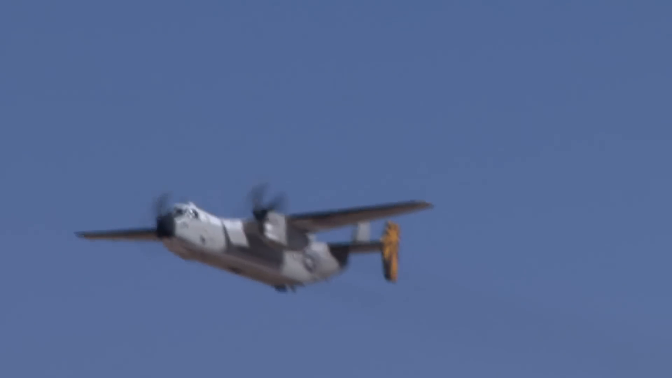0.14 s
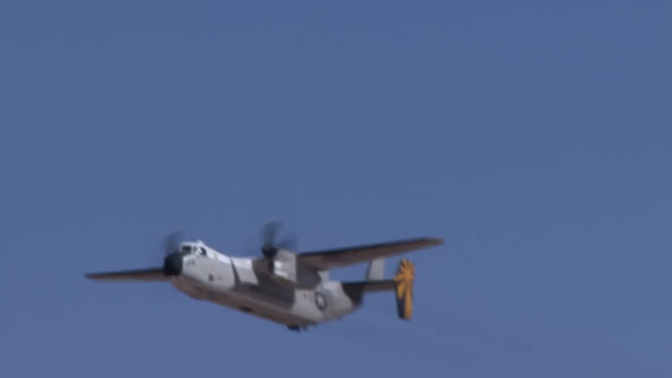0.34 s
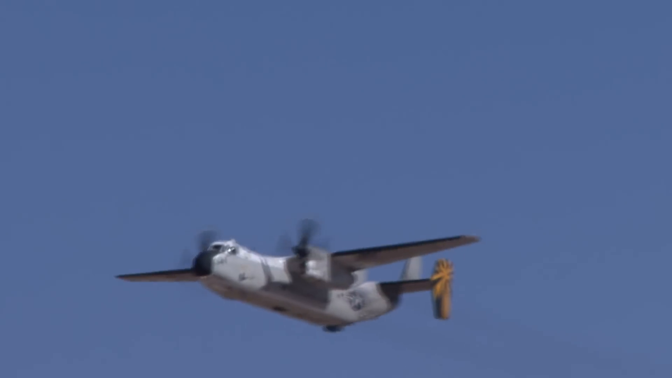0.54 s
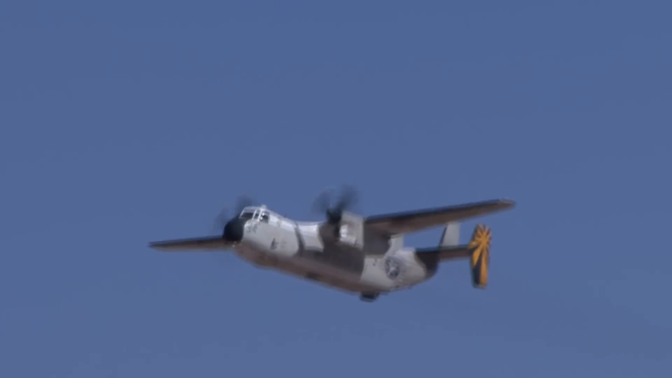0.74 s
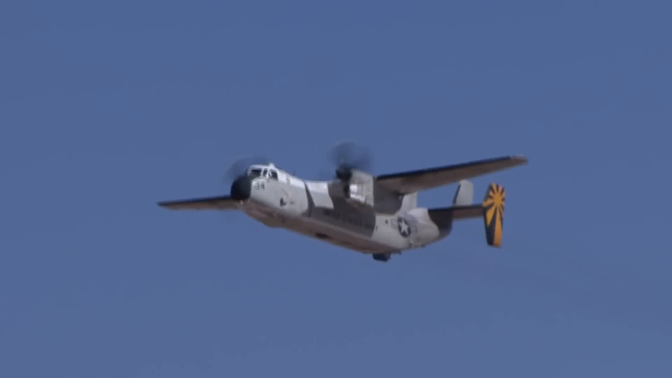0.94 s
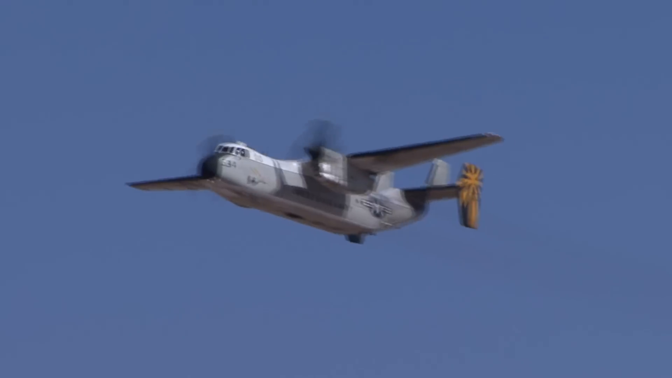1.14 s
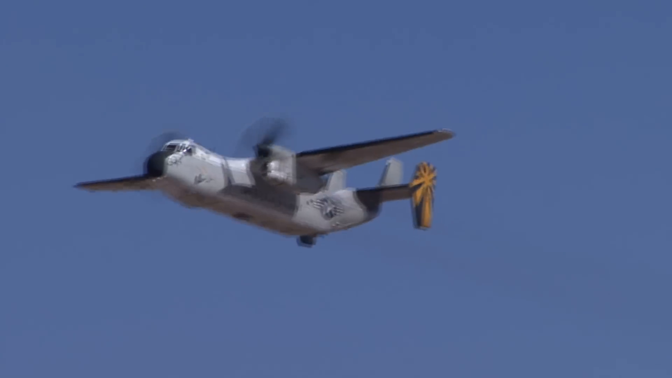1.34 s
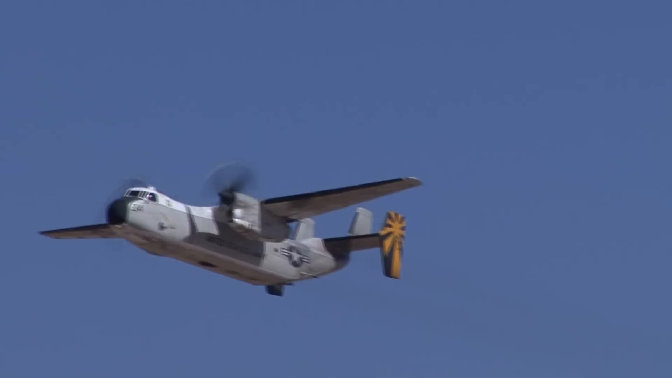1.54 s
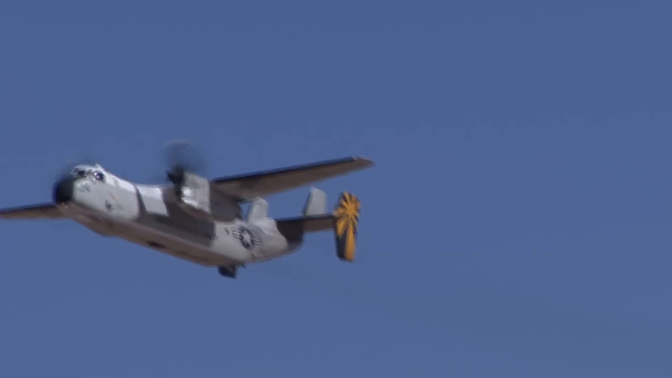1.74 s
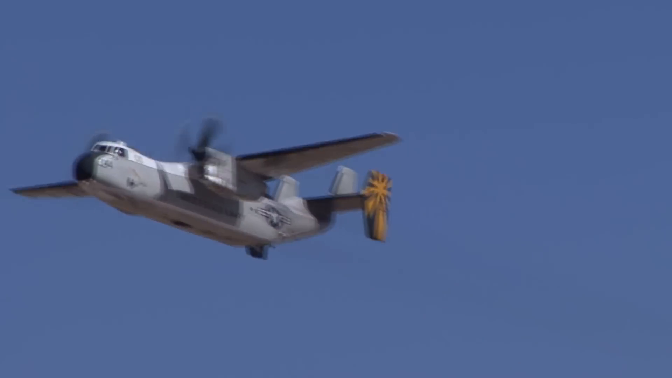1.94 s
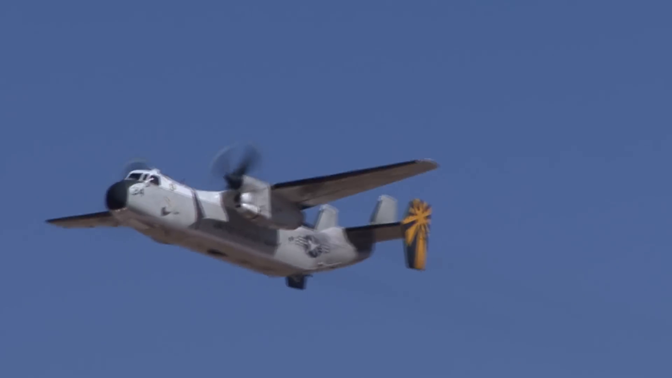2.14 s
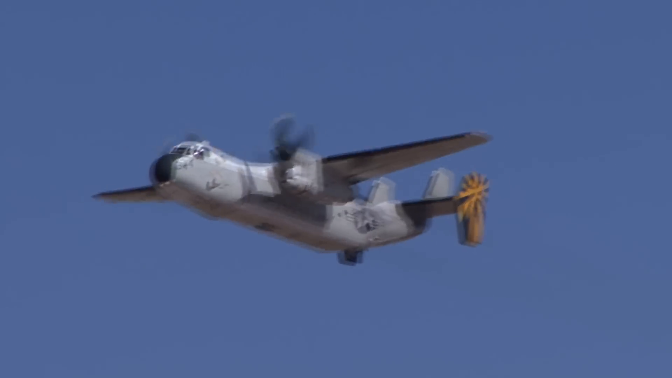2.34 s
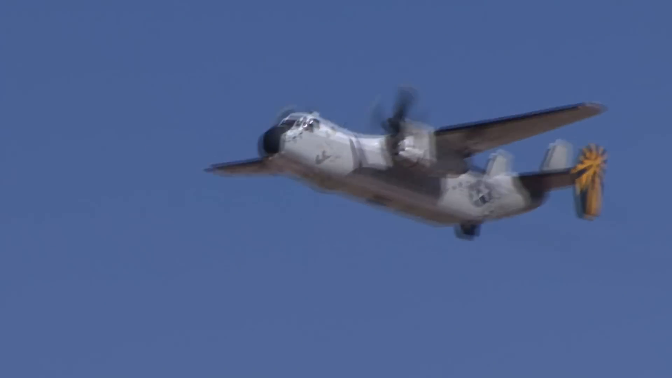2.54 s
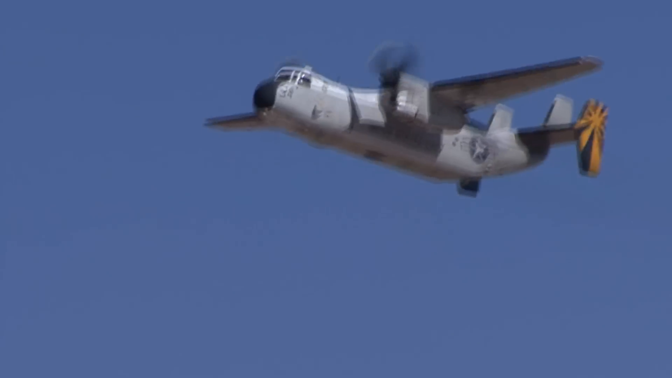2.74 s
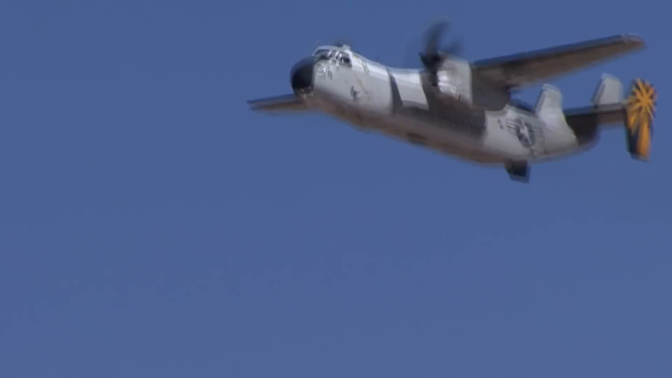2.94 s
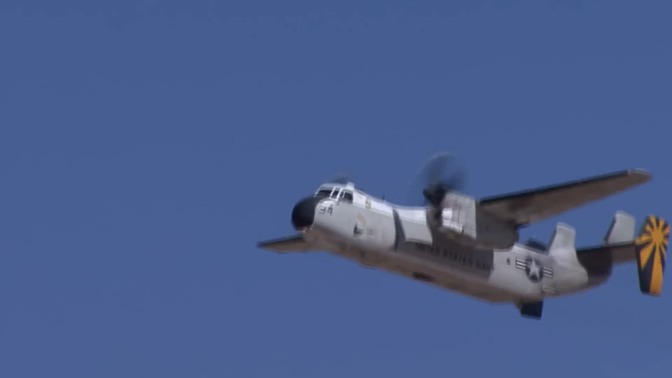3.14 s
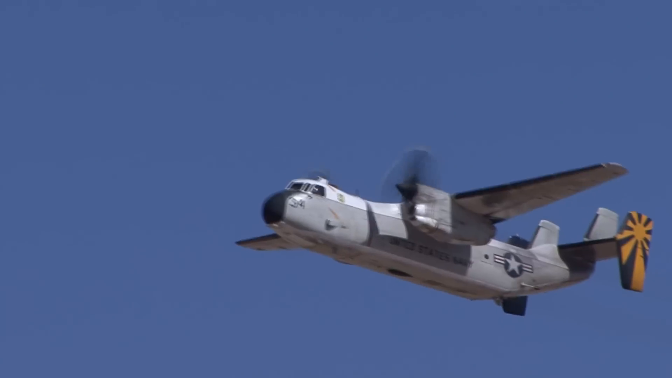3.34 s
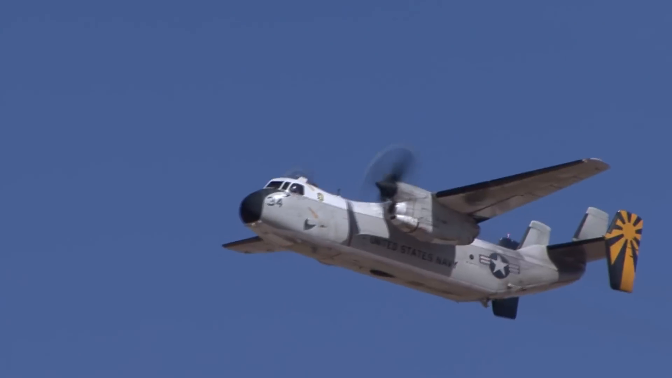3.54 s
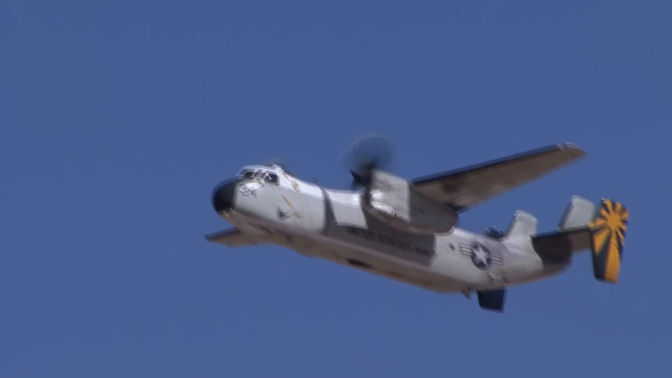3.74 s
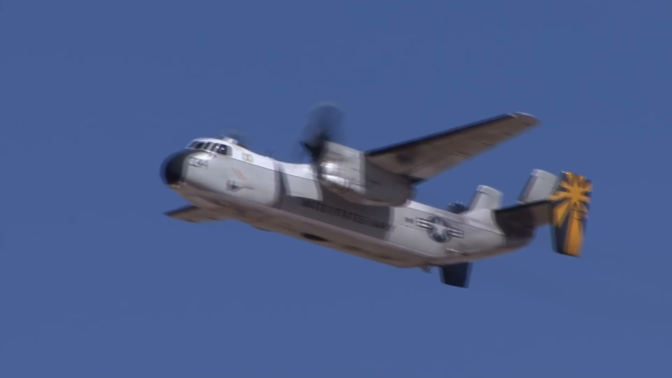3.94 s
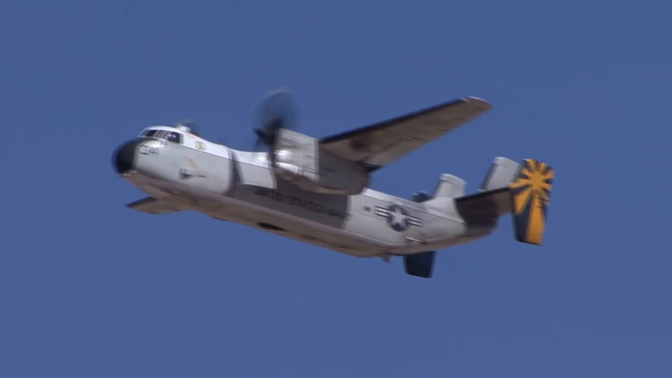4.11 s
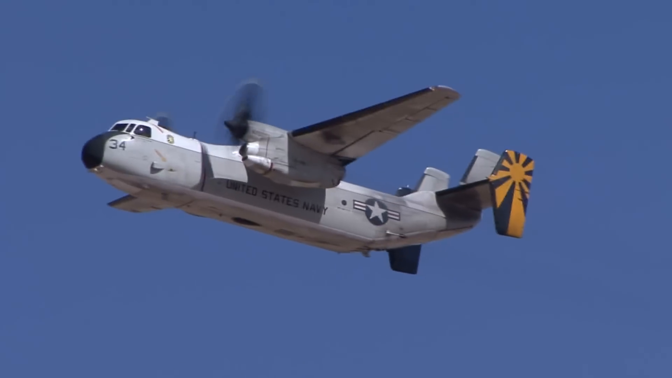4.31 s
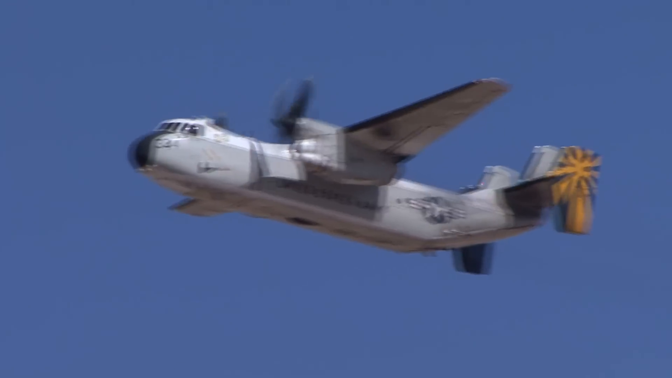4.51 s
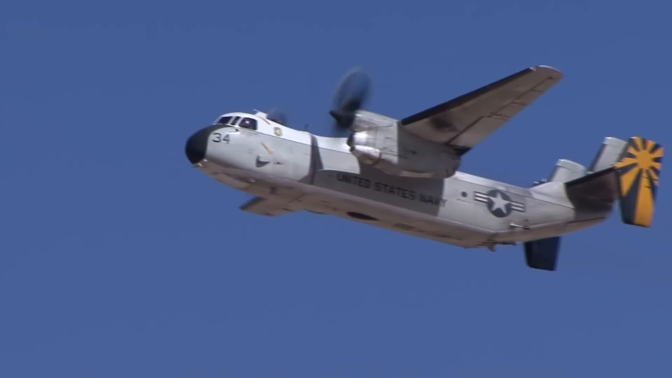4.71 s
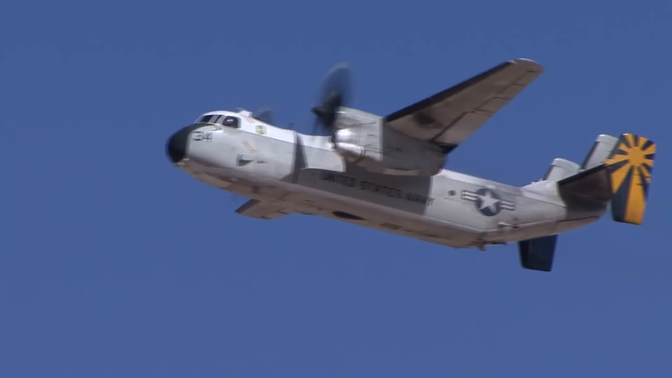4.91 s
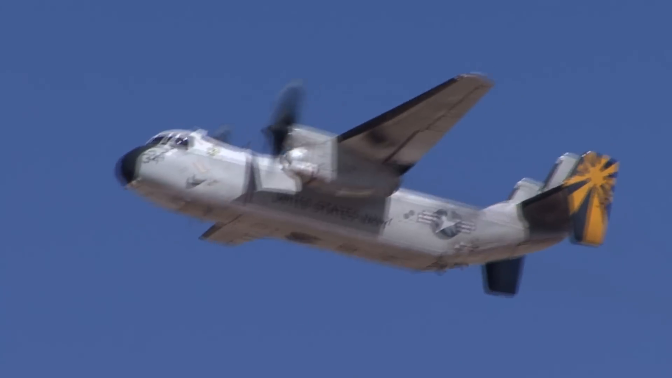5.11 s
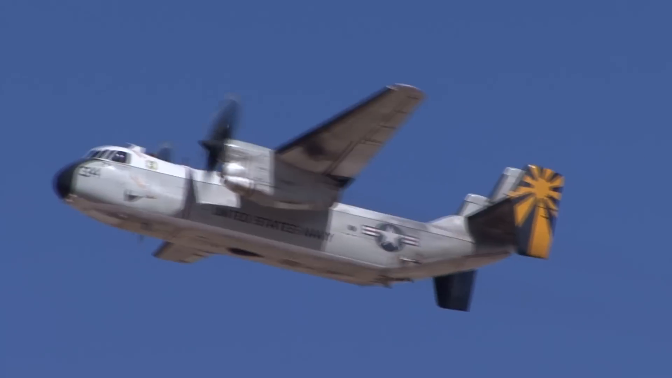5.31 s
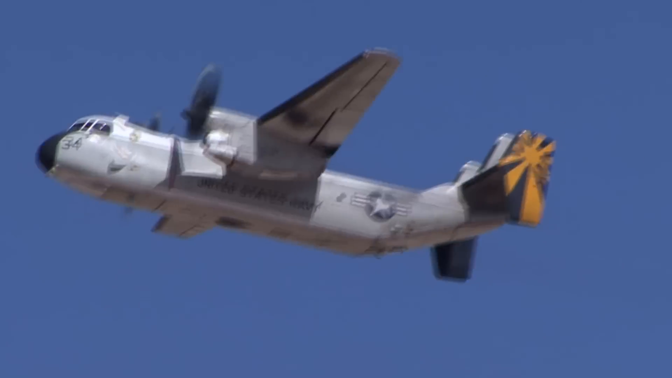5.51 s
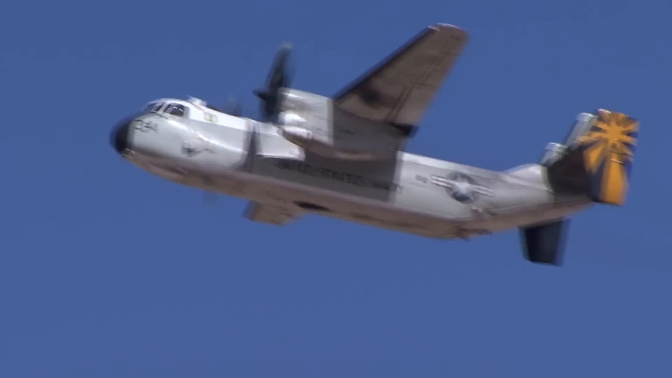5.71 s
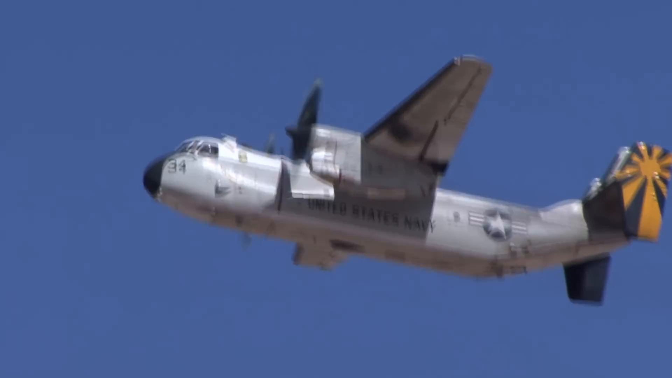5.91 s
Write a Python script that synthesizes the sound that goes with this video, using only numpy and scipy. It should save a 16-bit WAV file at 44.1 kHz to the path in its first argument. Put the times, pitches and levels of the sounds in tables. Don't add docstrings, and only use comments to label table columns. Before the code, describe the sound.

Deep propeller drone with a breathy, fluctuating roar draws nearer, pulsing and gradually dropping in pitch, over very faint hiss.

```python
import sys
import numpy as np
from scipy import signal
from scipy.fft import rfft, irfft
from scipy.io import wavfile
from scipy.ndimage import uniform_filter1d

SR = 44100
rng = np.random.default_rng(int(sys.argv[2]) if len(sys.argv) > 2 else 0)


def unload_audio(sound):
    columns = np.transpose(np.atleast_2d(sound))
    steps = np.round(np.clip(columns, -1, 1) * 32767)
    wavfile.write(sys.argv[1], SR, steps.astype(np.int16))


def elevation(decibels):
    levels = np.asarray(decibels, float)
    return 10 ** (levels / 20)


N = 267246

ROAR_BAND_HZ = [300, 760, 1900, 3900]


def in_time(rows, s):
    at, *columns = np.transpose(rows)
    return np.array([np.interp(s, at, c) for c in columns])


def at_hz(points, hz):
    point_hz, point_db = np.array(points)[:, :2].T
    return np.interp(np.log(hz), np.log(point_hz), point_db)


def rms_one(x):
    return x / np.sqrt(np.mean(x ** 2) + 1e-20)


def drift(rate):
    pole = np.exp(-80 * np.pi * rate / SR)
    noise = rng.standard_normal(N // 40 + 2002)
    slow = signal.lfilter([1], [1, -2 * pole, pole * pole], noise)[2000:]
    return np.interp(np.arange(N) / 40, np.arange(len(slow)), rms_one(slow - slow.mean()))


def shaped(spectrum):
    hz = np.arange(N // 2 + 1) * SR / N + 1
    white = rfft(rng.standard_normal(N))
    return rms_one(irfft(white * elevation(at_hz(spectrum, hz)), N))


def bell(s, at, half):
    return np.exp(-((s - at) / half) ** 2)


def low_noise(cutoff_hz, shape):
    sos = signal.butter(2, cutoff_hz, fs=SR, output="sos")
    return signal.sosfilt(sos, rng.standard_normal(shape))


def blade_motion(s):
    # t/s, blade rate f/Hz, fundamental level/dB
    blades = [(0.0, 92.7, -34.5), (0.56, 92.52, -36), (0.9, 92.1, -35.5), (1.4, 92.11, -36),
              (2.05, 91.68, -38), (2.4, 91.55, -38), (2.7, 91.42, -32), (3.05, 91.0, -32.5),
              (3.45, 89.75, -25), (4.15, 89.0, -27), (4.75, 87.35, -34.5), (5.05, 86.5, -30),
              (5.55, 85.07, -30), (6.06, 83.48, -39)]
    blade_hz, first_db = in_time(blades, s)
    blade_hz = uniform_filter1d(blade_hz, size=SR // 5, mode="nearest")
    start_turn = .47
    return start_turn + np.cumsum(blade_hz) / SR, first_db


def overtones(s):
    # t/s, half length/s, harmonic number, peak level/dB
    beams = [(0.045, 0.27, 2, -29.5), (0.05, 0.09, 3, -39.5), (0.91, 0.35, 2, -38), (1.146, 0.052, 3, -42),
             (1.332, 0.08, 2, -44), (1.604, 0.26, 3, -41.1), (1.776, 0.098, 2, -42.5),
             (1.804, 0.06, 3, -40), (2.07, 0.32, 2, -33), (2.291, 0.24, 3, -37), (2.632, 0.11, 3, -30.5),
             (2.704, 0.13, 2, -37.2), (2.784, 0.5, 2, -30.5), (2.842, 0.06, 3, -55), (3.015, 0.06, 3, -44),
             (3.244, 0.11, 3, -31.5), (3.412, 0.077, 3, -27.5), (3.426, 0.16, 2, -34.5),
             (3.627, 0.084, 3, -31.5), (3.877, 0.14, 2, -34), (3.922, 0.18, 3, -31.5),
             (4.217, 0.22, 3, -22.5), (4.272, 0.13, 2, -34), (4.72, 0.2, 3, -34), (5.167, 0.6, 2, -31.4),
             (5.23, 0.056, 2, -40.1), (5.281, 0.27, 3, -27.5), (5.75, 0.38, 2, -20.5),
             (6.02, 0.87, 3, -19.5), (6.06, 0.064, 2, -21.5)]
    # t/s, half length/s, harmonic number, peak level/dB
    glints = [(0.02, 0.2, 4, -35), (0.684, 0.14, 4, -46.5), (1.036, .13, 4, -37), (1.05, 0.075, 5, -46.5),
              (1.4, 0.12, 6, -39.5), (1.487, 0.27, 4, -31), (1.657, .3, 5, -43), (1.896, .2, 6, -42),
              (2.174, 0.2, 4, -34), (2.608, 0.088, 4, -29.5), (2.655, 0.12, 5, -38), (2.877, 0.15, 4, -30),
              (2.992, 0.12, 5, -33.5), (3.03, 0.09, 6, -39), (3.362, 0.21, 4, -32), (3.65, 0.063, 4, -32.5),
              (3.923, .08, 4, -33), (4.211, 0.073, 5, -43), (4.24, 0.2, 4, -26.5), (4.27, 0.11, 6, -35.5),
              (4.854, 0.11, 6, -38), (4.956, 0.041, 5, -47), (4.986, 0.31, 4, -28.3),
              (5.266, 0.091, 6, -42), (5.301, 0.07, 5, -37), (5.393, 0.22, 4, -29.5),
              (5.6, 0.057, 5, -33.5), (5.65, 0.12, 6, -45), (5.95, 0.18, 5, -36.5), (6.3, 0.44, 4, -26)]
    cancelled_db = -59
    gain = np.full((5, N), elevation(cancelled_db))
    for at, half, harmonic, peak_db in beams + glints:
        gain[int(round(harmonic)) - 2] += elevation(peak_db) * bell(s, at, half)
    return 20 * np.log10(gain)


def propellers(turns, levels_db, middle_db):
    # harmonic number, level above the middle roar/dB
    upper = [(7, -14), (8, -15), (9, -16)]
    twinkle_db = .35
    out = np.zeros(N)
    far = np.clip(np.linspace(2, 0, N), .12, 1)
    for k, level_db in enumerate(levels_db):
        slow, quick = drift(.5), drift(6)
        wander = far * np.sqrt(k + 1) * (.7 * slow + .08 * k * quick)
        level_db = level_db + twinkle_db * k * far * np.roll(quick, N // 2)
        lean = .55 - .4 * (k - 1.5) ** 2
        out += np.sqrt(2) * elevation(level_db) * np.sin(2 * np.pi * (k + 1) * turns + lean + wander)
    for multiple, above_db in upper:
        twinkle = elevation(middle_db + above_db + 2.2 * drift(3.3))
        out += twinkle * np.sin(2 * np.pi * multiple * turns + 2.1 * drift(1.9))
    return out


def air_path(s):
    # t/s, half length/s, gain level/dB, centre f/Hz
    eddies = [(0.027, 0.21, 14.5, 313), (0.07, 0.25, 7.5, 3110), (0.395, 0.14, 4, 707),
              (1.044, 0.21, 10, 625), (1.054, 0.48, 8, 2354), (1.371, 0.083, 6, 2800),
              (1.542, 0.19, 16, 633), (1.716, 0.31, 12.5, 4610), (1.906, 0.13, 9.5, 505),
              (2.214, 0.24, 10, 1710), (2.251, 0.2, 8.5, 180), (2.656, 0.2, 13, 5660),
              (2.672, 0.17, 13.5, 732), (2.959, 0.12, 14, 1360), (3.037, 0.4, 7.5, 182),
              (3.344, 0.29, 9.5, 2490), (3.397, 0.12, 5, 390), (3.679, 0.18, 10.5, 1012),
              (3.92, 0.14, 8, 2020), (4.276, 0.26, 18.5, 1230), (4.508, 0.35, 1, 177),
              (4.902, 0.21, 20, 1355), (5.021, 0.1, 4.2, 260), (5.262, 0.15, 14.5, 1070),
              (5.516, 0.2, 11.5, 1380), (5.945, 0.23, 14, 1130)]
    # t/s, half length/s, gain level/dB, centre
    # f/Hz
    ripples = [(.88, 0.032, 1.5, 895), (1.02, 0.03, 1, 4050), (1.62, 0.049, 0.5, 2265),
               (1.8, 0.065, 0.5, 3290), (2.6, 0.039, 4, 3970), (2.85, 0.067, 4.5, 1204),
               (3.29, 0.043, 5.5, 4370), (3.45, 0.04, 2.5, 401), (4.27, 0.06, 3.5, 5000),
               (4.86, .07, 1, 4920), (5.24, 0.052, 1.5, 4000), (5.47, 0.067, 5.5, 5400),
               (5.82, .05, 4, 4010), (0.69, 0.36, -2, 280), (3.9, 0.082, 2, 450), (6.6, 0.18, 4, 220),
               (3.2, 0.082, -1.5, 450), (1.3, .1, -1.5, 550), (3.7, 0.036, 1, 1600), (6.5, 0.058, 0, 1600),
               (1.75, .12, 0, 6000), (3.92, 0.094, -4, 1100), (4.1, 0.053, -2, 1000),
               (4.98, 0.06, -3, 1200), (6.05, 0.052, 4.5, 3700)]
    lull_db = [-47, -42.5, -54, -84]
    nearing_db_per_s = [1.93, 0.2, .05, 2.7]
    eddy_octaves = 1.95
    swell_db = np.array(lull_db)[:, None] + np.outer(nearing_db_per_s, s)
    for at, half, gain_db, hz in eddies + ripples:
        reach = bell(np.log2(ROAR_BAND_HZ), np.log2(hz), eddy_octaves)
        swell_db = swell_db + gain_db * np.outer(reach, bell(s, at, half))
    return swell_db


def roar(swell_db, patchy_db):
    # f/Hz, level/dB per Hz
    colour = [(25, -28), (70, -8.5), (130, -4.5), (320, 3), (700, -5.5), (980, -3), (1120, -8.5),
              (1700, -15.5), (2100, -16), (2900, -25.5), (3400, -29.5), (3800, -33), (5000, -43.5),
              (5700, -63)]
    roar_db, far_loss_db = -30, -11
    swell_db = swell_db - 10 * np.log10(np.mean(elevation(2 * swell_db), axis=1, keepdims=True))
    out = np.zeros(N)
    coloured = [shaped(colour), shaped(colour)]
    gust = drift(8.3)
    edges = 20 * 2 ** (np.arange(27) / 3)
    for k, (low, high) in enumerate(zip(edges, edges[1:])):
        hz = np.sqrt(low * high)
        place = np.interp(np.log(hz), np.log(ROAR_BAND_HZ), range(4))
        below = min(int(place), 2)
        band_db = swell_db[below] + (place - below) * (swell_db[below + 1] - swell_db[below])
        if hz > 3000:
            octaves = np.log2(min(hz, 5200) / 4000)
            band_db = band_db + far_loss_db * np.linspace(1, -.3, N) * octaves
        if hz < 170:
            band_db = band_db * np.clip(0.13 + 0.11 * (hz > 90), 0, 1)
        third_octave = signal.butter(2, [low, high], "band", fs=SR, output="sos")
        band = signal.sosfilt(third_octave, coloured[k % 2])
        out += band * elevation(band_db + patchy_db * (drift(6) + .3 * gust))
    return elevation(roar_db) * rms_one(out)


def whine(turns, top_db):
    order, width_hz, above_top_db = 55.6, 80, -9.5
    smear = low_noise(width_hz, (2, N))
    phase = 2 * np.pi * order * turns
    far_db = np.linspace(-13, 2, N)
    tone = smear[0] * np.cos(phase) + smear[1] * np.sin(phase)
    return elevation(top_db + above_top_db + far_db) * rms_one(tone)


def camera():
    # f/Hz, level/dB per Hz
    hiss = [(1500, -20), (3500, 1), (5600, 0), (9000, -3), (12000, -7.5), (14200, -8), (14400, -12),
            (15000, -13)]
    hiss_db, motor_hz, motor_db = -75, 149.85, -101
    multiples = np.arange(30, 80)
    uneven_db = 3 * rng.standard_normal(len(multiples))
    levels = elevation(motor_db + uneven_db - .15 * (multiples - 30))
    turn = 2 * np.pi * motor_hz * np.arange(N) / SR
    buzz = np.zeros(N)
    for multiple, level in zip(multiples, levels):
        buzz += level * np.sin(multiple * turn + rng.uniform(0, 2 * np.pi))
    return elevation(hiss_db) * shaped(hiss) + buzz


def handling():
    sway_db, sway_hz = -64, 14
    return elevation(sway_db) * rms_one(low_noise(sway_hz, N))


def scene():
    s = np.arange(N) / SR
    turns, first_db = blade_motion(s)
    swell_db = air_path(s)
    drone = propellers(turns, [first_db, *overtones(s)], swell_db[1])
    aircraft = drone + roar(swell_db, patchy_db=1.58) + whine(turns, swell_db[3])
    return (aircraft + camera() + handling())[None]


def roll_off(x):
    return signal.sosfilt(signal.butter(12, 15010, fs=SR, output="sos"), x)


def record(dry):
    return roll_off(dry)


dry = scene()
out = record(dry)
unload_audio(out)
```